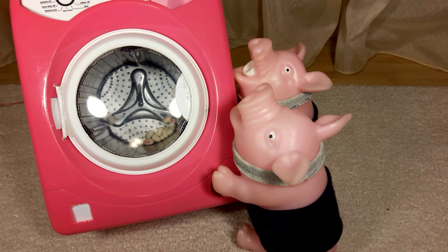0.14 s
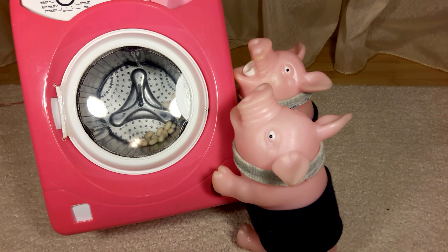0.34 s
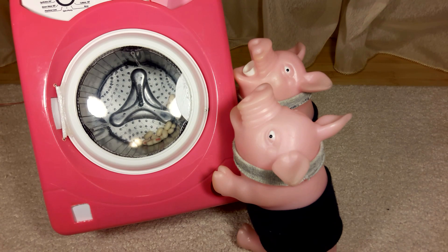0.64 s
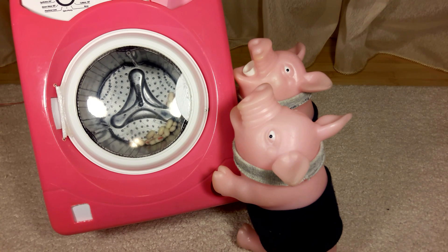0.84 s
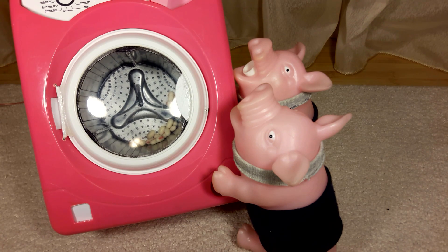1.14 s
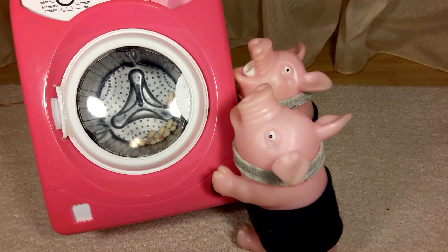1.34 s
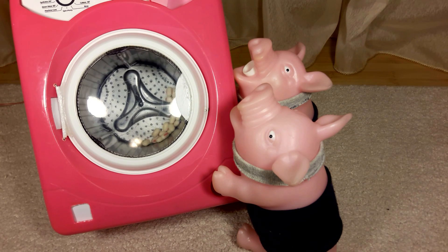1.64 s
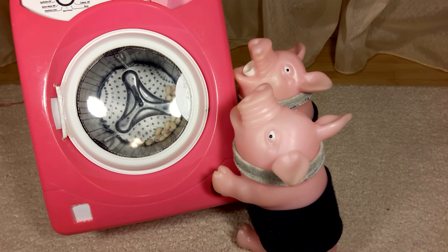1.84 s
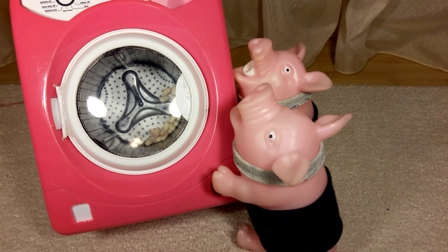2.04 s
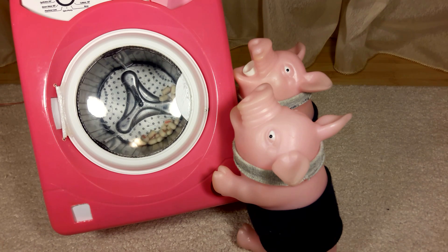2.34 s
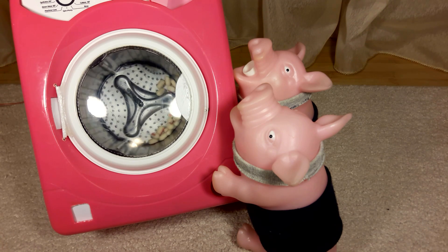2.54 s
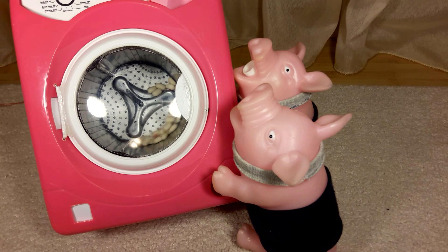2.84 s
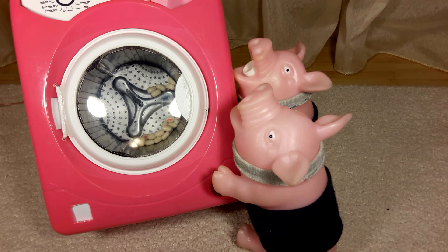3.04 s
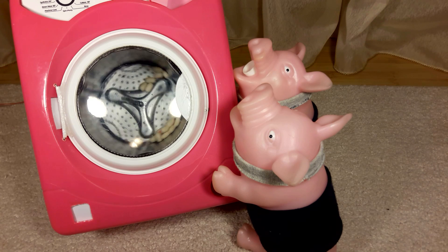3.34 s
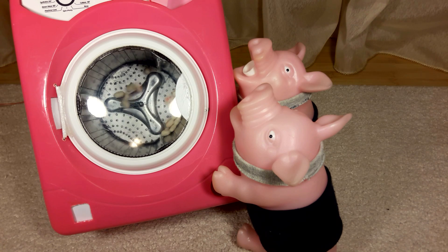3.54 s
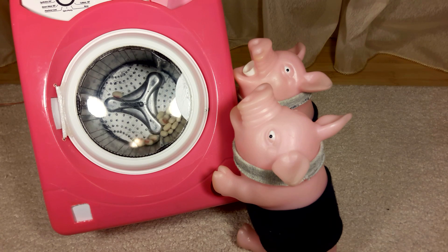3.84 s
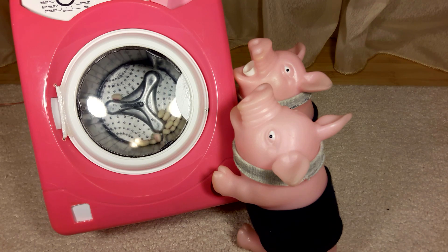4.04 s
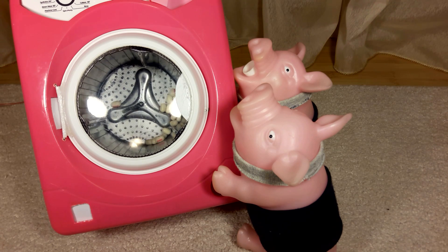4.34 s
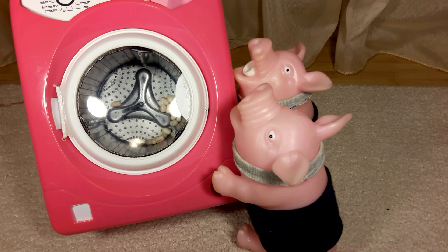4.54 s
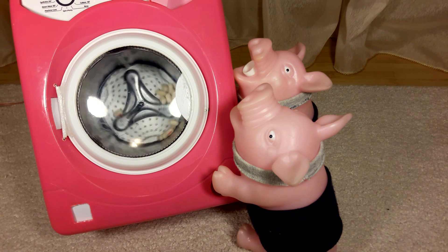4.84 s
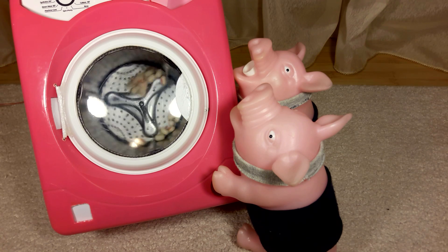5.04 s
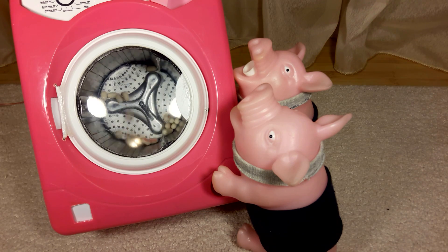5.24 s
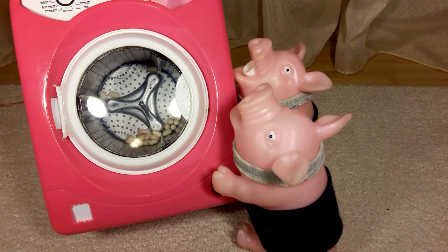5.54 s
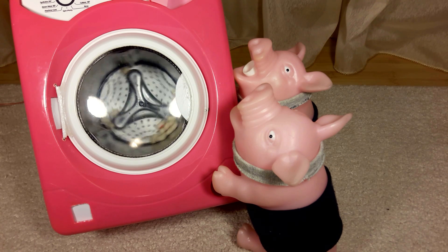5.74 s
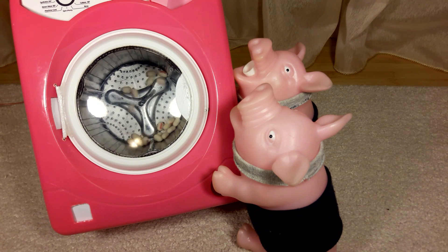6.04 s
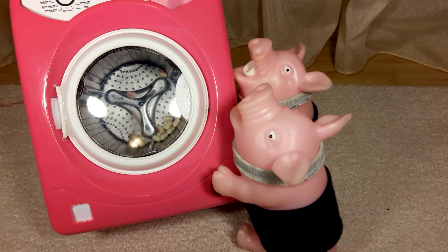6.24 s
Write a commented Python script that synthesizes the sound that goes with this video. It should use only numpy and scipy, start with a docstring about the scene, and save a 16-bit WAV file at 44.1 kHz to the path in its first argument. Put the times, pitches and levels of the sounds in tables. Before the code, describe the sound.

Close, dry stereo sound in a quiet carpeted room, with soft room tone, slight hiss and a very faint low hum. From 0 to 0.6 s small hard mints clatter in a hollow plastic toy drum, bright clicks with a short boxy ring, then thin out. Until about 2 s it is nearly silent apart from tiny dull hand knocks. A short rattle runs from 2.0 to 2.3 s, another from 2.8 to 3.0 s. Soft knocks and a slight drag near 3.4 s lead to a loud, dense tumble at 3.6-4.0 s, trailing into scattered ticks until 4.3 s. The hum swells a little around 4.3-4.6 s. After muffled knocks near 4.9 s, a longer, harder clatter fills 5.0-5.65 s. A brief lull with dull knocks follows, then a final bright, crowded rattle from about 5.95 s continues to the end near 6.4 s.

```python
"""A quiet carpeted room with two close microphones: small hard mints tumble in the plastic drum of a toy
washing machine that is turned by hand in short pushes. Each landing mint rings the modes of the drum shell
and, a little later, those of the hollow case; between loud blows a random swarm of light ticks follows the
tumbling. Soft knocks of the hand are dull rings, the room adds sparse decaying echoes, and beneath lie
shaped noise (room tone and microphone hiss) and a faint, unsteady sine hum."""
import sys
import numpy as np
from scipy import signal
from scipy.io import wavfile
from scipy.ndimage import uniform_filter1d

SR = 44100
rng = np.random.default_rng(int(sys.argv[2]) if len(sys.argv) > 2 else 0)


def attenuation_scalar(level_db):
    """Turn a level in dB into a linear amplitude multiplier (20 dB per decade)."""
    decades = np.asarray(level_db, float) / 20
    return 10 ** decades


def store_wav(level_fs):
    """Save 16-bit WAV to argv[1]."""
    pcm = np.round(np.clip(np.atleast_2d(level_fs), -1, 1) * 32767)
    wavfile.write(sys.argv[1], SR, pcm.T.astype(np.int16))


N = 281799  # length [samples]
RING = np.arange(3500) / SR  # time axis of one ring [s]

# mints that land clearly, alone or in a cluster: (time [s], relative level [dB], relative hardness [dB])
MINT_BLOWS = [(0.05, -12, -1), (0.066, -16, -6), (0.0927, -18, -5), (0.1069, -14, -5), (0.1403, -6.5, -2.5),
              (0.1672, -23, -5), (0.201, -5, -5.5), (0.225, -14, -9.5), (0.2618, -17.5, -8),
              (0.2889, -16.5, -5), (0.3146, -10.5, -3), (0.3387, -11.5, -7.5), (0.3627, -12, -6.5),
              (0.3926, -10, 0.5), (0.403, -7.5, -3), (0.414, -9, -1), (0.448, -12, -9.5),
              (0.4718, -10.5, -5.5), (0.4999, -15, -9.5), (0.5224, -20.5, -13.5), (0.553, -26, -16),
              (0.578, -22, -13), (1.6964, -37, -9), (1.9897, -28.5, -9), (2.0034, -18, -2),
              (2.0301, -15, -8.5), (2.071, -15.5, -3), (2.122, -8, -6.5), (2.1501, -16, -15),
              (2.1859, -9, -4.5), (2.2532, -22, -13), (2.2845, -23, -11.5), (2.809, -13.5, -7),
              (2.84, -12, -1), (2.8633, -10.5, -8.5), (2.9068, -22, -6), (2.9196, -16.5, -12),
              (2.9298, -7.5, -3), (2.9646, -14.5, -14), (2.9855, -19, -15.5), (3.5657, -23.5, -9),
              (3.6321, -15.5, -5.5), (3.65, -8.5, -2.5), (3.6799, -12.5, 4), (3.6966, -10, -4),
              (3.7134, -17, -12), (3.734, -4.5, -2.5), (3.7828, -5, -1), (3.802, -1.5, -5.5),
              (3.823, -11, 2), (3.844, -4.5, -3.5), (3.8722, -3, -3), (3.9018, -5, -5), (3.93, -22, 3),
              (3.9541, -17, -13), (3.981, -27, -12), (4.0576, -21, -10), (4.0782, -19.5, -13.5),
              (4.131, -32, -14), (4.1441, -33, -17), (4.163, -17, -6.5), (4.196, -12.5, -3.5),
              (4.2282, -18.5, -1), (4.2631, -19.5, -7.5), (4.4404, -29.5, -12.5), (4.553, -20.5, -8),
              (4.591, -31.5, -13), (4.667, -38.5, -14), (4.9638, -23.5, -4), (4.9878, -20, -6),
              (5.0119, -18, -9), (5.0241, -12, -1), (5.0838, -12, -6), (5.097, -10, 1), (5.1462, -7, 1),
              (5.1685, -9, -3), (5.1796, -15, -9), (5.1963, -6, 4), (5.2381, -10.5, 9), (5.2558, -4.5, -5),
              (5.2694, -5, -1.5), (5.2914, -16, -12), (5.3023, -2.5, 4.5), (5.3348, -5, -5.5),
              (5.3447, -7.5, -2), (5.3789, -2.5, -5.5), (5.3982, -5.5, -2), (5.4504, -13, -8),
              (5.4674, -12.5, 0), (5.494, -3.5, -3), (5.515, -3, -4.5), (5.563, -17.5, -9),
              (5.5831, -10, -5), (5.632, -20, -13), (5.654, -20, 1), (5.9106, -28, -12.5),
              (5.953, -23, -10), (5.9801, -20, -12), (5.993, -7, 4), (6.0193, -11.5, -6),
              (6.0397, -7.5, -1), (6.068, -4.5, 4), (6.1132, -10, -5), (6.14, -13.5, -4.5),
              (6.1684, -12, -5), (6.1888, -19, -9), (6.2103, -7, 1.5), (6.2281, -7, -4.5),
              (6.2524, -2.5, -4.5), (6.2839, -4, 0.5), (6.325, -12.5, -7), (6.3707, -9, -7),
              (6.377, -5.5, -4.5)]
# soft dull knocks of a hand on the toy: (time [s], relative level [dB])
HAND_KNOCKS = [(0.039, -33.5), (0.8281, -42.5), (1.1328, -44.5), (1.547, -47), (1.6, -43.5),
               (2.4168, -42.5), (2.4748, -45.5), (2.5015, -46), (2.616, -42.5), (3.2263, -44),
               (3.256, -43.5), (3.3085, -46), (3.3728, -33.5), (3.5, -38.5), (3.5225, -37.5), (4.7995, -41),
               (4.894, -36), (4.9293, -32.5), (5.7666, -38), (5.8685, -36.5)]
KNOCK_HARDNESS_DB, KNOCK_SPOT_HZ = -23, 3020

# clear modes of the drum shell: (frequency [Hz], bandwidth [Hz], relative level [dB])
SHELL_MODES = [(1684, 36, -14), (1843, 21, -13), (2153, 55, 3.5), (2198, 48, 3.5), (2480, 60, -16),
               (2836, 35, -2), (3300, 90, -21), (3857, 85, 8.5), (4040, 170, 0.5), (4880, 77, 4.5),
               (5500, 47, 0.5), (6046, 56, 3.5), (8670, 50, -6)]
# clear modes of the hollow case: (frequency [Hz], bandwidth before the damping floor [Hz], relative level [dB])
CASE_MODES = [(148.3, 40, -17.5), (187, 69, -10.5), (274.5, 51, -8.5), (332.5, 52.2, -2.5),
              (430, 36, -11.5), (559.4, 61.7, -3), (744, 97, -7), (921, 140, -9.5), (1122, 86, -12.5),
              (1199, 66, -3.5), (1678, 70, -8.5)]
# strength of the crowd of lesser shell modes: (frequency [Hz], relative level [dB])
CROWD_STRENGTH = [(350, -43), (600, -10.5), (1040, -24.5), (1200, -17.5), (1390, -22.5), (2000, -6.5),
                  (2140, -9.5), (2630, -6.5), (3770, -1), (4900, 1), (8880, -9.5), (9380, -13),
                  (13600, -11), (16300, -24)]
# decay of that crowd: (frequency [Hz], time to fall by 60 dB [s])
CROWD_DECAY = [(800, 0.047), (2500, 0.059), (6000, 0.048), (14000, 0.041)]
CROWD_SHARE_DB = -3  # added to the strength of the crowd

# likeness of the drum at the two microphones: (frequency [Hz], correlation [0 to 1])
DRUM_LIKENESS = [(200, 0.98), (600, 0.86), (1500, 0.58), (4000, 0.38), (12000, 0.76)]
# balance of the drum: (frequency [Hz], left over right [dB])
DRUM_BALANCE = [(60, 0.5), (130, 0), (290, 2), (640, 1.5), (1410, 2.5), (3100, 2.5), (6000, 4), (8500, -6),
                (15000, 0)]

# spectrum of room tone and microphone hiss: (frequency [Hz], relative density [dB per Hz])
HUSH_SPECTRUM = [(20, -24.5), (40, -10), (58, 0.5), (90, -10), (130, -0.5), (300, -9.5), (1000, -9),
                 (2000, -17.5), (4000, -27), (7000, -33.5), (10000, -33.5), (13000, -25), (15500, -32),
                 (16500, -47)]
HUSH_RMS_DB = -56.5
# likeness of the hush at the two microphones: (frequency [Hz], correlation [0 to 1])
HUSH_LIKENESS = [(60, 0.52), (240, 0.92), (950, 0.23), (3770, 0), (15000, 0.11)]
# balance of the hush: (frequency [Hz], left over right [dB])
HUSH_BALANCE = [(60, 1.5), (240, 2.5), (950, 2), (3770, 1), (15000, -0.5)]

# faint low hum: (time [s], mean frequency [Hz], rms level [dB])
HUM_COURSE = [(0, 130, -67.5), (1.2, 130, -67.5), (4.25, 135.8, -67.5), (4.31, 176.2, -55),
              (4.56, 176.3, -56.5), (4.62, 135, -64.5), (5.6, 133, -68.5), (5.7, 133, -59),
              (6.39, 133, -58.5)]
# reverberation of the room: (frequency [Hz], time to fall by 60 dB [s])
ROOM_DECAY = [(250, 0.36), (2000, 0.29), (10000, 0.07)]

# stirrings of the heap, level bent at four times, not always in order:
# (four times [s], level of the ticks [dB])
HEAP_STIRRINGS = [(0.0, 0.046, 0.11, 0.23, -38.5), (0.24, 0.375, 0.59, 0.67, -34.5),
                  (1.99, 2.2, 2.23, 2.38, -29), (2.4, 2.43, 2, 2.35, -62), (2.6, 2.62, 2.65, 2.8, -62),
                  (2.7, 2.76, 2.6, 3.3, -59), (2.81, 2.859, 3.006, 3.15, -28.5),
                  (3.35, 3.37, 3.42, 3.56, -54), (3.48, 3.572, 3.63, 3.73, -39),
                  (3.56, 3.682, 4.22, 3.987, -23.5), (4.04, 4.07, 4.28, 4.2, -52),
                  (4.414, 4.438, 4.61, 4.66, -54), (4.76, 4.773, 4.84, 5, -55.5),
                  (4.85, 4.894, 4.96, 4.99, -49), (4.884, 5.032, 5.39, 5.58, -26.5),
                  (5.1, 5.149, 5.33, 5.5, -21), (5.33, 5.417, 5.445, 5.73, -23.5),
                  (5.85, 5.895, 5.96, 6.02, -46), (5.916, 5.999, 6.12, 6.3, -20.5),
                  (6.17, 6.208, 6.3, 6.52, -30)]
REST_DB = -71.5  # ticks of the heap at rest
SCATTER_DB, SCATTER_S = -21.5, 0.019  # ticks shaken loose: level against the blow, fading time
RUMBLE_DB, RUMBLE_SLOPE = -21, 0.66  # the case rumble grows more slowly than the ticks
DRAG_DB, DRAG_S = -13.5, 0.027  # hand dragging on the case: level against the knock, fading time


def read(points, hz):
    """Logarithmic interpolation: a spectrum is read on a log-frequency axis."""
    f, value = np.transpose(points)
    return np.interp(np.log(hz + 1), np.log(f + 1), value)


def curve(rows, column):
    """Linear interpolation: one column of a time table at every sample."""
    return np.interp(np.arange(N) / SR, np.transpose(rows)[0], np.transpose(rows)[column])


def add(mix, s, sound):
    """Superposition: a stereo sound is summed into the mix at time s."""
    part = mix[:, round(s * SR):][:, :sound.shape[1]]
    part += sound[:, :part.shape[1]]


def paired(z, hz, same, lean):
    """Partial coherence: two complex draws become a left and right, partly alike, with a level difference."""
    c = np.clip(read(same, hz), -1, 1)
    side = attenuation_scalar(read(lean, hz) / 2)
    left = z[0] * side
    right = (c * z[0] + np.sqrt(1 - c ** 2) * z[1]) / side
    return np.stack([left, right])


def hush():
    """Stationary noise: random spectra shaped in frequency give room tone and microphone hiss."""
    frames, hz = N // 512 + 5, np.fft.rfftfreq(2048, 1 / SR)
    draw = rng.standard_normal((frames, 1025, 4)).T
    z = (draw[:2] + 1j * draw[2:]).transpose(0, 2, 1)
    z = paired(z, hz, HUSH_LIKENESS, HUSH_BALANCE).transpose(0, 2, 1)
    z = z * attenuation_scalar(read(HUSH_SPECTRUM, hz))[:, None]
    noise = signal.istft(z, nperseg=2048, noverlap=1536)[1][:, :N]
    return attenuation_scalar(HUSH_RMS_DB) * noise / np.std(noise)


def drone():
    """Frequency modulation: a faint low sine hum, its level varying and its pitch a little unsteady."""
    waver = uniform_filter1d(rng.standard_normal(N), 2000) * np.sqrt(2000)
    hz = curve(HUM_COURSE, column=1) + 2.5 * waver
    phase = 2 * np.pi * np.cumsum(hz) / SR
    return np.sqrt(2) * attenuation_scalar(curve(HUM_COURSE, column=2)) * np.sin(phase)


def struck(hz, width, db, favour_db, scatter_db):
    """Modal superposition: every blow drives the same damped modes with other strengths and phases."""
    # each mode reaches the right side shifted in phase
    turn = np.exp(1j * np.minimum(hz / 4000, 2.5) * rng.standard_normal(len(hz)))
    draw = rng.standard_normal((len(favour_db), len(hz), 4)).T
    z = attenuation_scalar(scatter_db * draw[:2]) * np.exp(1j * np.pi * draw[2:])
    z = paired(z.transpose(0, 2, 1), hz, DRUM_LIKENESS, DRUM_BALANCE) * attenuation_scalar(db + favour_db)
    z[1] *= turn
    modes = np.exp((2j * np.pi * hz - np.pi * width)[:, None] * RING)
    return z.real @ modes.real - z.imag @ modes.imag  # real part of the complex product


def shell(spot_hz, hard_db):
    """Modal excitation: clear and crowded modes, lifted near the pitch of the spot; soft contact is dull."""
    crowd_hz = np.linspace(700, 16000, num=240) + rng.uniform(-30, 30, 240)
    crowd_width = np.log(1000) / np.pi / read(CROWD_DECAY, crowd_hz)  # bandwidth from decay time
    clear_hz, clear_width, clear_db = np.transpose(SHELL_MODES)
    hz = np.r_[clear_hz, crowd_hz]
    width = np.r_[clear_width, crowd_width]
    db = np.r_[clear_db, read(CROWD_STRENGTH, crowd_hz) + CROWD_SHARE_DB]
    lift_db = 6.75 * np.exp(-(np.log(hz / spot_hz[:, None]) / 0.13) ** 2)
    tilt_db = 0.74 * (hard_db[:, None] + 5.0) * np.log2(np.minimum(hz, 8000) / 3000)
    return struck(hz, width, db, lift_db + tilt_db, scatter_db=1.9)


def case(count):
    """Delayed build-up: the low modes of the hollow case swell over several ms."""
    hz, width, db = np.transpose(CASE_MODES)
    least_width = 48  # plastic damps every mode at least this much [Hz]
    rings = struck(hz, np.maximum(width, least_width), db, np.zeros((count, 1)), scatter_db=4.22)
    return rings * (1 - np.exp(-RING / 0.0068))


def fading(rows, offset_db, fade_s):
    """Exponential decay: power that jumps at each event and dies away."""
    power = np.zeros(N)
    s, db = np.transpose(rows)[:2]
    power[(s * SR).astype(int)] = attenuation_scalar(2 * (db + offset_db))
    return signal.lfilter([1], [1, -np.exp(-1 / (fade_s * SR))], power)


def stir_db():
    """Addition of powers: tick level from the stirrings of the heap plus what each blow shakes loose."""
    t = np.arange(N) / SR
    stirrings = [np.interp(t, row[:4], [REST_DB, row[4], row[4], REST_DB]) for row in HEAP_STIRRINGS]
    heap_db = np.max(stirrings, 0)
    return 10 * np.log10(fading(MINT_BLOWS, SCATTER_DB, SCATTER_S) + attenuation_scalar(2 * heap_db))


def swarm(rings, per_s, spread_db, level_db):
    """Shot noise: random light hits of uneven size, each on one of a few spots, under a level curve."""
    size = attenuation_scalar(spread_db * np.minimum(rng.exponential(1, N), 4)) * (rng.random(N) < per_s / SR)
    ring_energy = np.sum(rings ** 2) / rings[..., 0].size
    size *= attenuation_scalar(level_db) / np.sqrt(np.mean(size ** 2) * ring_energy)
    spots = rings.shape[1]
    spot = rng.integers(0, spots, N)
    return sum(signal.oaconvolve((size * (spot == k))[None], rings[:, k], axes=1)[:, :N]
               for k in range(spots))


def tumble():
    """Random impacts: the rolling heap ticks on the shell, duller when it creeps, and rumbles in the case."""
    rings = shell(np.geomspace(2000, 7000, num=20), np.linspace(-9, -3, num=20))
    rings = rings * (1 - np.exp(-RING / 0.006))
    level_db = stir_db()
    ticks = swarm(rings, 320, 1.5, level_db)
    dull = signal.sosfilt(signal.butter(2, 3500, fs=SR, output="sos"), ticks)
    bright = np.clip((level_db + 60.5) / 24, 0, 1)  # share of the full treble
    rumble = attenuation_scalar(2 * (RUMBLE_DB + RUMBLE_SLOPE * level_db)) + fading(HAND_KNOCKS, DRAG_DB, DRAG_S)  # power
    return dull + bright * (ticks - dull) + swarm(case(count=16), 300, 1.7, 10 * np.log10(rumble))


def blows():
    """Impact excitation: louder blows rise more slowly, and softer contact puts more into the case."""
    knocks = [(*row, KNOCK_HARDNESS_DB) for row in HAND_KNOCKS]
    s, db, hard_db = np.transpose(MINT_BLOWS + knocks)
    spot, lag = rng.random((len(s), 2)).T
    rise_s = 0.0028 * attenuation_scalar(0.12 * db) * (0.33 + 0.9 * lag)
    rise = 1 - np.exp(-(RING / rise_s[:, None]) ** 2)
    spot_hz = 2000 * 3.32 ** spot
    spot_hz[len(MINT_BLOWS):] = KNOCK_SPOT_HZ
    rings = shell(spot_hz, hard_db) * rise
    booms = case(count=len(s))
    booms /= np.sqrt(np.mean(booms[..., :1000] ** 2))
    out = np.zeros((2, N))
    for k in range(len(s)):
        ring = rings[:, k] / np.sqrt(np.mean(rings[:, k, :300] ** 2))  # equal power at the onset
        boom = attenuation_scalar(-27.0 - 0.33 * hard_db[k]) * booms[:, k]
        add(out, s[k], attenuation_scalar(db[k] - 10.0) * (ring + boom))
    return out


def room(x):
    """Reverberation: sparse reflections of random sign, each band decaying at its own rate, the bass alike."""
    size = SR // 2
    taps = np.zeros((2, size))
    at = np.arange(300, size - 20, 20) + rng.integers(0, 20, (2, (size - 301) // 20))
    np.put_along_axis(taps, at, rng.choice([-1., 1.], at.shape), 1)
    hz, t, z = signal.stft(taps, SR, nperseg=256)
    alike = np.exp(-hz / 1500)[:, None]  # likeness of left and right
    z[1] = alike * z[0] + np.sqrt(1 - alike ** 2) * z[1]
    decay = attenuation_scalar(-60 * t / read(ROOM_DECAY, hz)[:, None])
    tail = signal.istft(z * decay, SR, nperseg=256)[1]
    return signal.fftconvolve(x, tail / np.linalg.norm(tail[0]), axes=1)[:, :N]


def scene():
    """Linear superposition: drum, reflections, room tone and hum; so small a case radiates no deep bass."""
    no_bass = signal.butter(4, 120, "high", fs=SR, output="sos")
    drum = signal.sosfilt(no_bass, blows() + tumble())
    reflected = attenuation_scalar(-13) * room(drum)
    return drum + reflected + hush() + drone()


def low_pass(x):
    """Removes everything above the highest recorded frequency."""
    return signal.sosfilt(signal.butter(12, 16510, fs=SR, output="sos"), x)


def record(dry):
    """Band limitation: a linear-phase low-pass removes the highest treble of the mix."""
    edge = signal.firwin(255, 16400, window=("kaiser", 8), fs=SR)
    mix = signal.oaconvolve(dry, edge[None], "same", axes=1)
    return low_pass(mix)


dry = scene()
out = record(dry)
store_wav(out)
```